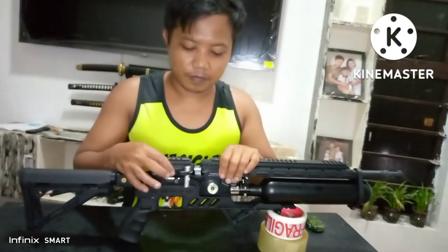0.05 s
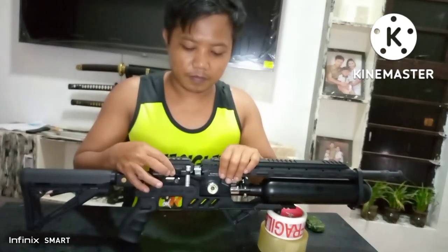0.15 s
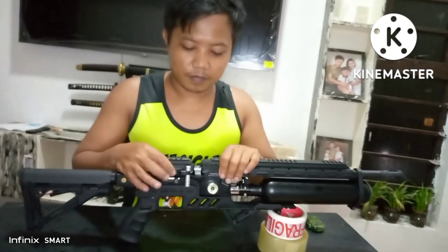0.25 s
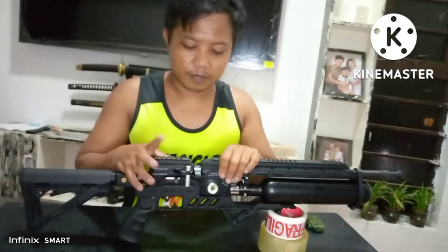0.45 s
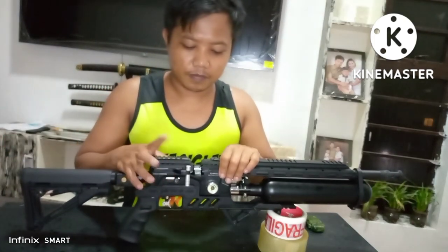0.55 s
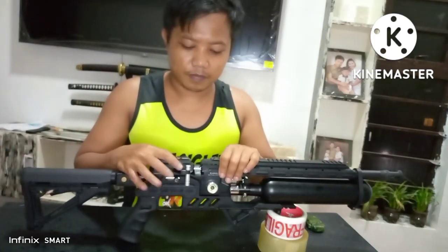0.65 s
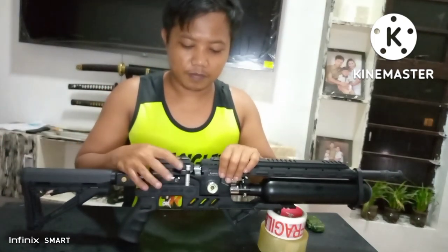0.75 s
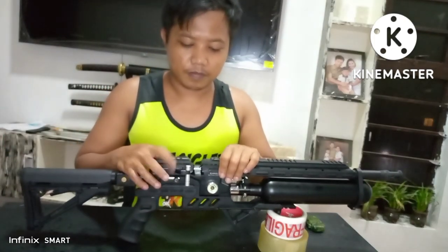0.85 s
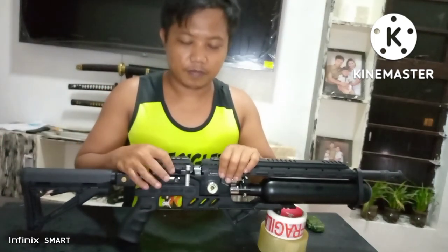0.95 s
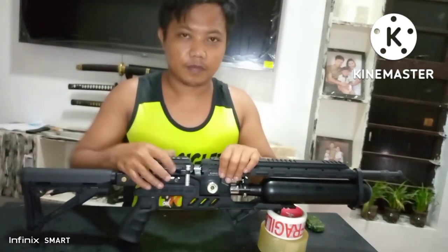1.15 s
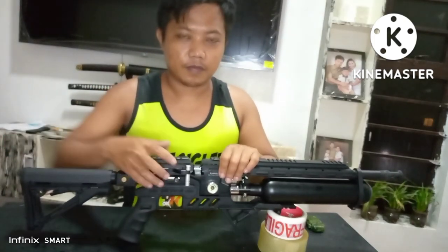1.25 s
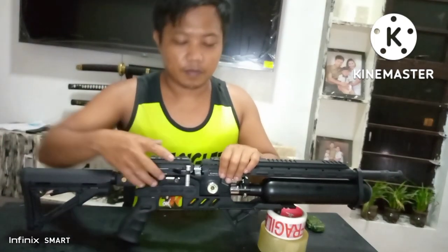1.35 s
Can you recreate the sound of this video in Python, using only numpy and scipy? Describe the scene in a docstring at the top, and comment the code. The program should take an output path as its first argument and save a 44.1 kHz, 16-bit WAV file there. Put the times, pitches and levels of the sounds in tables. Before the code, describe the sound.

A sharp steel snap of an air rifle's side lever dominates at 0.22 s, after a thin, high scrape from the start and a light tick near 0.06 s. It chatters briefly and rings brightly in a small, hard room. A faint double click follows at 0.65 s with a soft stock knock, then low table bumps until 1.22 s and a faint hand brush near 1.04 s. Quiet room noise; right side louder.

```python
"""Over quiet room noise a thin scrape and a light tick lead into a bright steel snap that rings on.
The steel side lever of an air rifle is worked in a small, hard-walled room; later a faint click follows.
The stock knocks and bumps softly on the table, and a hand brushes over the rifle.
Scrape and rings are unsteady sines; contacts, room answers and brushes are coloured, enveloped noise.
One microphone feeds both channels, louder on the right, through noise suppression."""
import sys
import numpy as np
from scipy import signal
from scipy.fft import rfft, irfft, next_fast_len
from scipy.io import wavfile
from scipy.ndimage import uniform_filter1d

SR = 44100
rng = np.random.default_rng(int(sys.argv[2]) if len(sys.argv) > 2 else 0)


def dump(signal):
    """Clip the signal to [-1, 1] and save it as 16-bit WAV at the path in sys.argv[1]."""
    limited = np.clip(np.atleast_2d(signal).T, -1, 1)
    pcm = np.round(limited * 32767).astype(np.int16)
    wavfile.write(sys.argv[1], SR, pcm)


N = 61739  # length in samples


def amp(db):
    """Decibels to gain."""
    return 10 ** (np.asarray(db) / 20)


def unit(x):
    """Scale to rms 1."""
    return x / np.sqrt(np.mean(x ** 2) + 1e-20)


def along(points, hz):
    """Read (f/Hz, value) points on a log frequency axis."""
    f, value = np.transpose(points)
    return np.interp(np.log(hz + 1), np.log(f + 1), value)


def since(s):
    """Seconds since s, zero before it."""
    return np.maximum(np.arange(N) / SR - s, 0)


def filtered(x, response):
    """Shape the spectrum of x by a response of frequency, padded against wrap-around."""
    padded = next_fast_len(N + SR // 2)
    spectrum = rfft(x, padded) * response(np.fft.rfftfreq(padded, 1 / SR))
    return irfft(spectrum, padded)[:N]


def low_cut(x, hz):
    """A causal third-order high-pass."""
    sos = signal.butter(N=3, Wn=hz, btype="high", fs=SR, output="sos")
    return signal.sosfilt(sos, x)


def noise(colour):
    """Noise of rms 1 with the given spectral colour."""
    return unit(filtered(rng.standard_normal(N), lambda hz: amp(along(colour, hz))))


def flutter(width_hz):
    """A random curve of rms 1 whose movement fades out above width_hz."""
    return unit(filtered(rng.standard_normal(N), lambda hz: 1 / (1 + (hz / width_hz) ** 4)))


def ring(modes, s, blur=0.707, blur_hz=25):
    """Struck modes from s on: decaying sines whose phase wanders by blur radians rms."""
    t = since(s)
    total = 0
    for hz, db, t60 in modes:
        phase = 2 * np.pi * (hz * t + rng.random()) + blur * flutter(blur_hz)
        total = total + amp(db - 60 * t / t60) * np.sin(phase)
    return (t > 0) * total


def crack(colour, s, t60):
    """The direct sound of a contact: coloured noise that starts at once and decays."""
    t = since(s)
    return (t > 0) * amp(-60 * t / t60) * noise(colour)


# decay of the room: f/Hz, t60/s
ROOM_DECAY = [(150, 0.39), (1000, 0.697), (2400, 0.4463), (4800, 0.436), (7500, 0.328), (11000, 0.2144),
              (15000, 0.216)]
ROOM_HOLD_S = 0.0416  # the early reflections keep the level up


def room(colour, s):
    """The walls' dense answer to a contact: it holds briefly, then each frequency dies at its own speed."""
    hz, t, z = signal.stft(noise(colour), SR, nperseg=512)
    age = np.maximum(t - s - ROOM_HOLD_S, 0)
    decay = amp(-60 * age / along(ROOM_DECAY, hz)[:, None])
    tail = signal.istft(z * decay, SR, nperseg=512)[1][:N]
    onset = 1 - np.exp(-since(s) / 0.00045)
    return tail * onset


# colour of the room noise: f/Hz, relative level/dB per Hz
AIR_COLOUR = [(20, -8.5), (40, -9), (70, 10), (125, 2.5), (175, 8.5), (270, 0.5), (430, 0), (620, 1.5),
              (1000, -1), (1400, -1), (2000, -5), (2600, -5), (3300, -10.5), (5300, -12), (7400, -9),
              (9000, -16.5), (12000, -26.5), (15000, -25)]
AIR_DB = -56
# faint steady tones in the room: f/Hz, level/dB
WHINE_TONES = [(1375, -70), (2602, -71)]


def air():
    """Room noise with two faint tones of wavering phase."""
    t = since(0)
    tones = sum(amp(db) * np.sin(2 * np.pi * hz * t + flutter(13.2)) for hz, db in WHINE_TONES)
    return amp(AIR_DB) * noise(AIR_COLOUR) + tones


# path of the sliding bolt: t/s, level/dB, middle resonance f/Hz
SLIDE_PATH = [(0, -55.5, 3922), (0.051, -58, 3956), (0.066, -55.5, 4052), (0.099, -54.5, 4056),
              (.125, -61, 4090), (0.171, -63, 4122), (0.201, -66.5, 4090), (.225, -93.5, 3950)]
SLIDE_SPREAD_HZ, SLIDE_JITTER_HZ, SLIDE_ROUGH_DB = 170, 151.8, 0.5


def slide():
    """Steel rubbing on steel sings in three close, jittery resonances that first rise a little."""
    s, db, hz = np.transpose(SLIDE_PATH)
    t = since(0)
    pitch = np.interp(t, s, hz)
    scrape = 0
    for side in (-1, 0, 1):
        jittery = pitch + side * SLIDE_SPREAD_HZ + SLIDE_JITTER_HZ * flutter(313)
        scrape = scrape + np.sin(2 * np.pi * np.cumsum(jittery) / SR)
    level = np.interp(t, s, db) + SLIDE_ROUGH_DB * flutter(120)
    return unit(scrape) * amp(level)


# light ticks of the linkage: t/s, level/dB
TICK_TIMES = [(.0575, -45), (.202, -72)]
# colour of a tick: f/Hz, relative level/dB per Hz
TICK_TONE = [(1000, -26), (4000, -5), (7500, -3.5), (8600, -4.5), (9600, -5), (10400, -9), (13000, -13),
             (15000, -4.5)]
# modes of the linkage: f/Hz, relative level/dB, t60/s
LINKAGE_MODES = [(9170, 2, 0.076), (9950, 3.5, 0.068), (10890, -2.5, 0.11)]
TICK_RING_DB, TICK_ROOM_DB, TICK_T60_S = -6.5, -11, 0.064  # ring and room relative to the direct sound


def ticks():
    """Small bright contacts in the linkage, each with its own short ring and room."""
    total = 0
    for s, db in TICK_TIMES:
        tick = crack(TICK_TONE, s, TICK_T60_S)
        tick = tick + amp(TICK_RING_DB) * ring(LINKAGE_MODES, s)
        tick = tick + amp(TICK_ROOM_DB) * room(TICK_TONE, s)
        total = total + amp(db) * tick
    return total


# contacts of the lever as it snaps home: t/s, relative level/dB
SNAP_CONTACTS = [(0.2228, -0.5), (0.2291, -4), (0.2348, -7), (0.2613, -10)]
# colour of the snap: f/Hz, relative level/dB per Hz
SNAP_TONE = [(100, -42), (600, -38.5), (800, -19.5), (1050, -10.5), (1300, -16), (1680, -27), (2000, -5.5),
             (2450, -2.5), (2850, -6), (3080, -16.5), (3650, -8), (4100, -11.5), (4800, 0.5), (5600, -5),
             (7100, -5.5), (8400, -7), (10500, -12.5), (15000, -16)]
# modes of the action: f/Hz, relative level/dB, t60/s before the faster fade
ACTION_MODES = [(962.4, -15.5, 0.43), (1054, -14, 0.92), (1152.7, -14, 0.84), (1294.3, -18, 0.87),
                (2014, -8, 0.635), (2144.2, -9.5, 0.674), (2406, -4, 0.595), (2458, -7.5, 0.754),
                (2690, -12, 0.855), (2881, -4.5, 0.365), (3680, -5, 0.345), (4356, -9.5, 0.57),
                (4673, -1.5, 0.507), (4823, -1.5, 0.436), (4905, 1, 0.465), (5074, -7, 0.487),
                (5370, -3, 0.386), (5431, -1, 0.336), (5810, -1, 0.41), (5940, -2, 0.491), (6370, -5, 0.23),
                (6430, -15.5, 0.23), (7000, 3, 0.189), (7267, 0.5, 0.405), (7670, -7.5, 0.4),
                (9230, -6, 0.282)]
# colour of the room's low answer: f/Hz, relative level/dB per Hz
LOW_ROOM_COLOUR = [(100, -30.5), (300, -23.5), (600, -19.5), (780, -6.5), (1000, 2), (1250, -7),
                   (1500, -15.5), (2500, -37), (8000, -60)]
SNAP_ROOM_DB, SNAP_CRACK_DB, SNAP_RING_DB, CRACK_T60_S = -27, -18, -33, 0.0104
SNAP_LOW_HZ = 1112  # the steel parts radiate little below this
SPIKE_S, SPIKE_DB, SPIKE_HZ, SPIKE_WIDTH_S = .2234, -10, 5870, 0.000248  # the first hard steel contact
LOW_ROOM_DB, LOW_ROOM_RISE_S = -41.5, 0.0403  # the low answer swells up slowly
LOW_ROOM_T60_S = 0.238  # before the faster fade
FADE_S, FADE_T60_S = 0.4572, 0.363  # from here on the tail fades faster


def snap():
    """The lever hits its stop and chatters; the action and the room ring on, the room's lows swelling late."""
    start = SNAP_CONTACTS[0][0]
    t = since(0) - SPIKE_S
    spike = amp(SPIKE_DB) * np.exp(-(t / SPIKE_WIDTH_S) ** 2) * np.cos(2 * np.pi * SPIKE_HZ * t)
    contacts = 0
    for s, db in SNAP_CONTACTS:
        direct = amp(SNAP_CRACK_DB) * crack(SNAP_TONE, s, CRACK_T60_S)
        walls = amp(SNAP_ROOM_DB) * room(SNAP_TONE, s)
        contacts = contacts + amp(db) * (direct + walls)
    steel = low_cut(contacts + amp(SNAP_RING_DB) * ring(ACTION_MODES, start), SNAP_LOW_HZ)
    rise = np.minimum(since(start) / LOW_ROOM_RISE_S, 1)
    swell = rise * amp(LOW_ROOM_DB - 60 * since(start + LOW_ROOM_RISE_S) / LOW_ROOM_T60_S)
    fade = amp(-60 * since(FADE_S) / FADE_T60_S)
    return spike + (steel + swell * noise(LOW_ROOM_COLOUR)) * fade


# knocks of the stock: t/s, level/dB, time from onset to decay/s
STOCK_KNOCKS = [(0.257, -60, 0.0477), (0.651, -53.5, 0.0575)]
# modes of the stock: f/Hz, relative level/dB
STOCK_MODES = [(82, 1), (173, -8), (307, 1.5), (345, -7.5), (391, -3.5), (463, 0)]
KNOCK_RISE_S, KNOCK_T60_S = 0.0124, 0.069


def stock():
    """The stock shudders briefly after the snap and around the click, and is damped by the hands."""
    shape = 0
    for s, db, length in STOCK_KNOCKS:
        rise = np.minimum(since(s) / KNOCK_RISE_S, 1)
        shape = shape + amp(db) * rise * amp(-60 * since(s + length) / KNOCK_T60_S)
    body = 0
    for hz, db in STOCK_MODES:
        phase = 2 * np.pi * (hz * since(0) + rng.random()) + .5 * flutter(40)
        body = body + amp(db) * np.sin(phase)
    return shape * body


# soft bumps on the table: t/s, level/dB, f/Hz
TABLE_BUMPS = [(0.296, -53.5, 78), (0.448, -55.5, 70.8), (0.691, -48.5, 64.3), (0.781, -54.5, 66.5),
               (0.819, -58, 85.5), (0.901, -57, 70.5), (1.086, -48, 66.5), (1.223, -49, 67.8)]
BUMP_WIDTH_S = 0.0187


def bumps():
    """The rifle's weight shifts on the table: a few low cycles under a bell-shaped swell each time."""
    total = 0
    for s, db, hz in TABLE_BUMPS:
        t = since(0) - s
        total = total + amp(db) * np.exp(-(t / BUMP_WIDTH_S) ** 2) * np.cos(2 * np.pi * hz * t)
    return total


# the catch clicks and settles: t/s, relative level/dB
CLICK_CONTACTS = [(.6446, 1.5), (0.6514, -2)]
# colour of the click: f/Hz, relative level/dB per Hz
CLICK_TONE = [(700, -24.5), (1700, -14), (2300, 1), (2750, -7), (3100, -1.5), (3600, -4.5), (4150, -2.5),
              (4500, -17.5), (5600, -16.5), (7000, -27.5), (15000, -34.5)]
# modes of the catch: f/Hz, relative level/dB, t60/s
CATCH_MODES = [(2065, -10, 0.48), (2952, 1, 0.26), (3170, 6.5, 0.125), (3625, -4.5, 0.138),
               (3896, -5, 0.27), (4044, -2, 0.208)]
CLICK_ROOM_DB, CLICK_CRACK_DB, CLICK_RING_DB, CLICK_T60_S = -57, -43, -50.5, 0.053


def click():
    """The catch drops in and settles in two contacts; the first sets off a short ring and the room."""
    first = CLICK_CONTACTS[0][0]
    contacts = sum(amp(CLICK_CRACK_DB + db) * crack(CLICK_TONE, s, CLICK_T60_S) for s, db in CLICK_CONTACTS)
    catch = amp(CLICK_RING_DB) * ring(CATCH_MODES, first)
    walls = amp(CLICK_ROOM_DB) * room(CLICK_TONE, first)
    return contacts + catch + walls


# a hand brushes over the rifle: t/s, level/dB, half length/s
HAND_BRUSHES = [(0.919, -69.5, 0.013), (1.038, -59, 0.035)]
# colour of the brushing: f/Hz, relative level/dB per Hz
BRUSH_TONE = [(1000, -25.5), (4000, -4.5), (7000, 6), (9800, -3), (15000, -16)]


def brushes():
    """Skin slides softly over the rifle: bell-shaped swells of noise."""
    strokes = sum(amp(db) * np.exp(-((since(0) - s) / half) ** 2) for s, db, half in HAND_BRUSHES)
    return noise(BRUSH_TONE) * strokes


TONE_S, TONE_DB, TONE_HALF_S, TONE_HZ, TONE_RISE_HZ_PER_S = 0.95, -60, 0.0355, 872.5, 1640


def rising_tone():
    """A very faint short rising tone: an unsteady sine under a bell-shaped swell."""
    t = since(0) - TONE_S
    phase = 2 * np.pi * (TONE_HZ + TONE_RISE_HZ_PER_S * t / 2) * t + flutter(55)
    return amp(TONE_DB) * np.exp(-(t / TONE_HALF_S) ** 2) * np.sin(phase)


BALANCE_DB = -10.5  # left minus right


def scene():
    """All sources at one microphone, louder in the right channel."""
    mono = air() + slide() + ticks() + snap() + stock() + bumps() + click() + brushes() + rising_tone()
    gains = np.array([amp(BALANCE_DB), 1])
    return np.outer(gains / gains.mean(), mono)


# depth, threshold over each band's median level, softness of the transition
SUPPRESS_DB, SUPPRESS_ABOVE_DB, SUPPRESS_KNEE_DB = -5.5, 11, 6.5


def suppress(x):
    """Noise suppression: every band is turned down while it lies near its own floor, its median level."""
    z = signal.stft(x, SR, nperseg=512)[2]
    power = uniform_filter1d(np.abs(z) ** 2, size=3, axis=0)  # smooth over frequency
    power = uniform_filter1d(power, size=3, axis=1)  # smooth over time
    level = 10 * np.log10(np.abs(power) + 1e-20)
    over = level - np.median(level, axis=1, keepdims=True) - SUPPRESS_ABOVE_DB
    gain = amp(SUPPRESS_DB * (1 - np.tanh(over / SUPPRESS_KNEE_DB)) / 2)
    return signal.istft(z * gain, SR, nperseg=512)[1][:N]


# colour of the microphone: f/Hz, level/dB
MIC_COLOUR = [(20, -2.5), (7600, 0.5), (9000, -6), (11500, -8.5), (13600, -12.5), (14400, -3),
              (15200, -0.5)]
TOP_HZ = 15520  # nothing passes from here up


def record(dry):
    """Noise suppression, then the microphone's colour and the band limit."""
    def response(hz):
        return amp(along(MIC_COLOUR, hz)) * (hz < TOP_HZ)
    return np.array([filtered(suppress(channel), response) for channel in dry])


dry = scene()
out = record(dry)
dump(out)
```